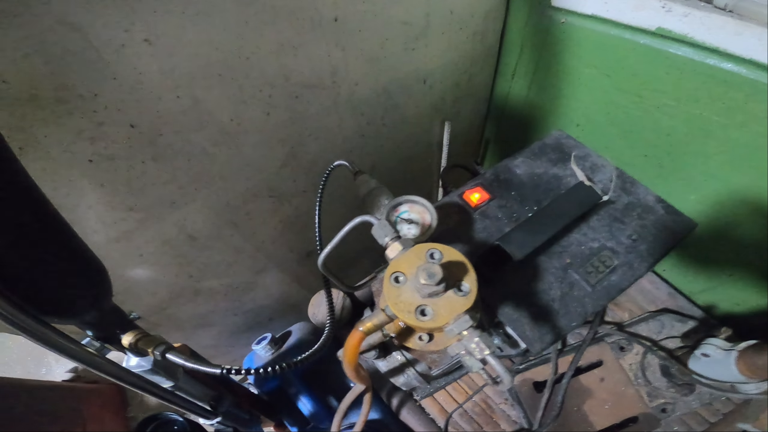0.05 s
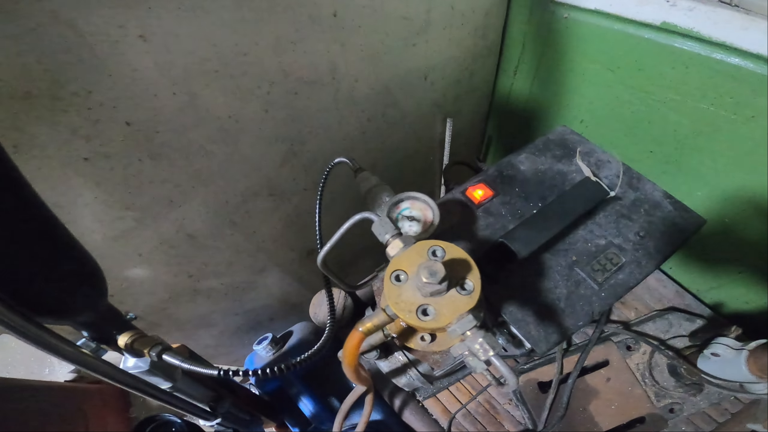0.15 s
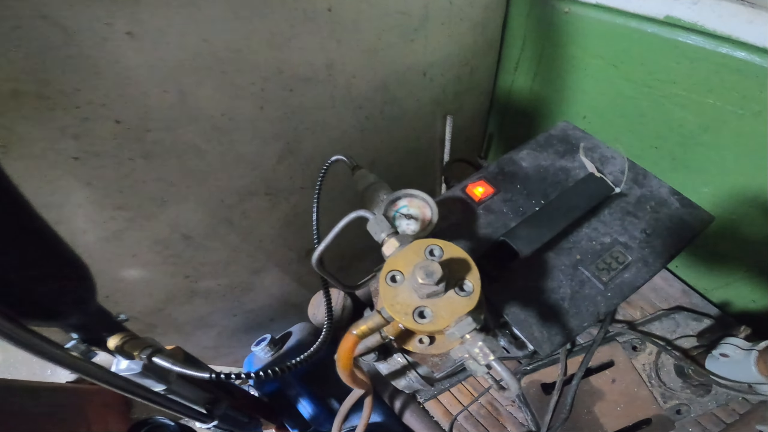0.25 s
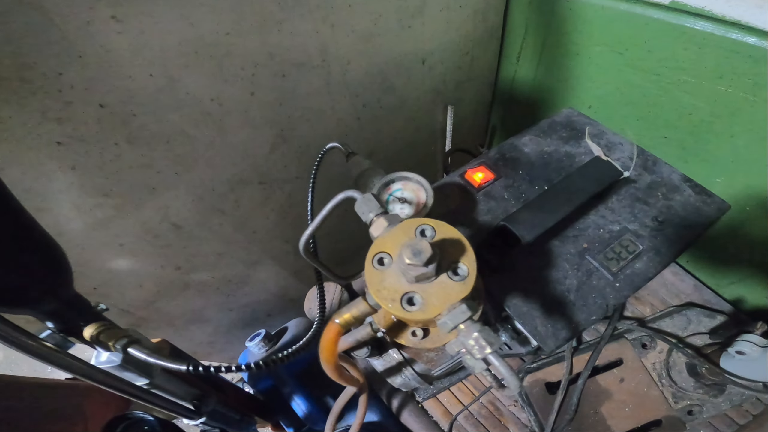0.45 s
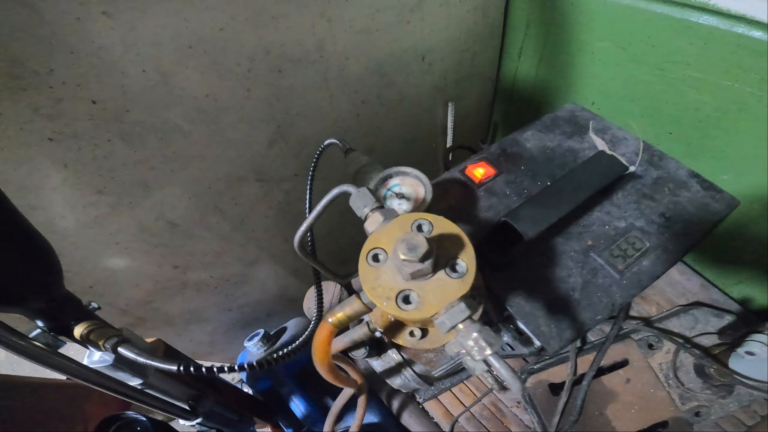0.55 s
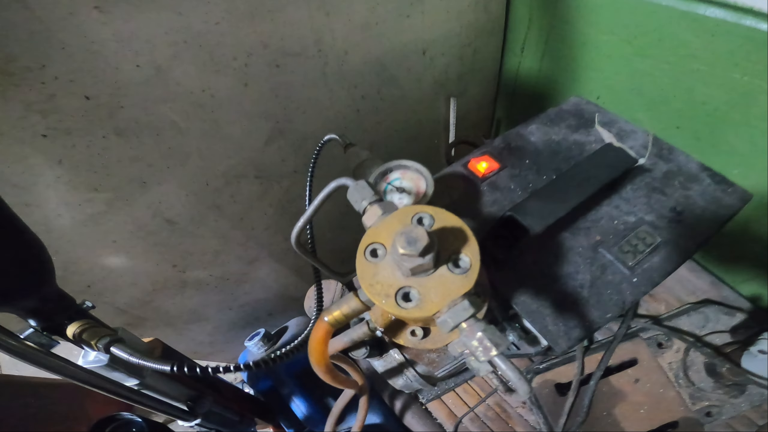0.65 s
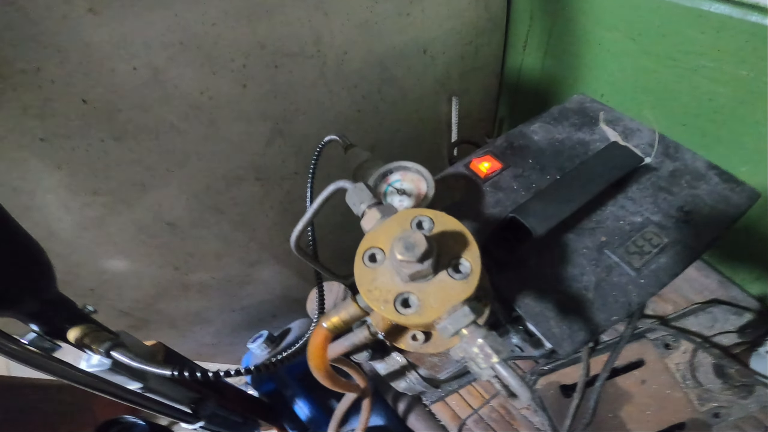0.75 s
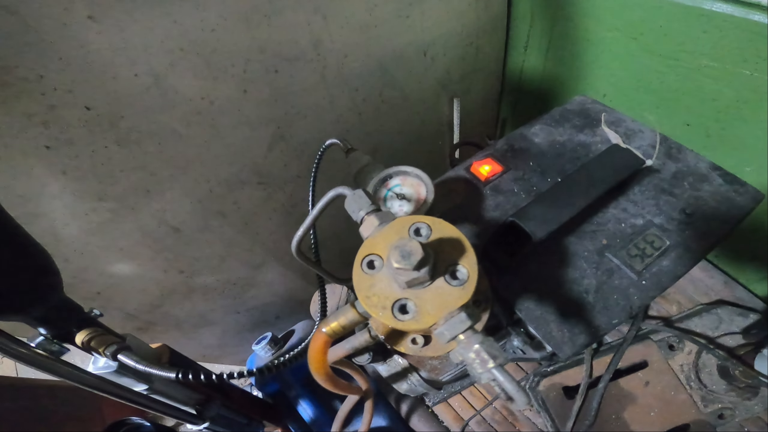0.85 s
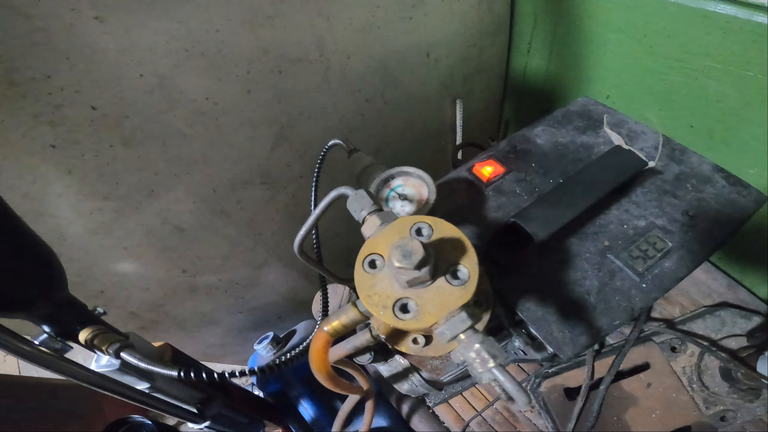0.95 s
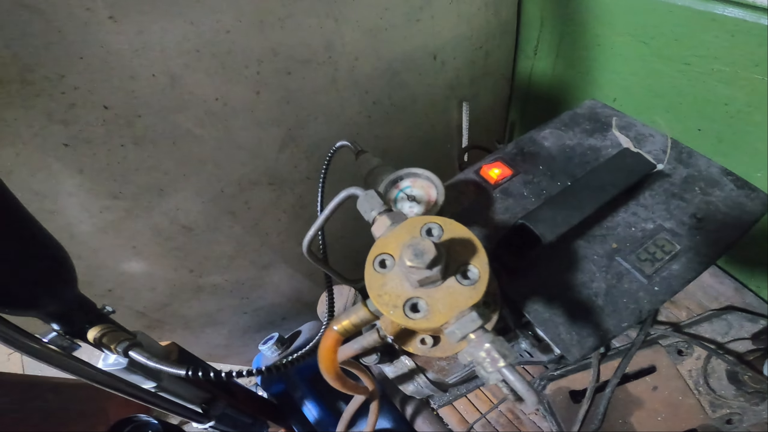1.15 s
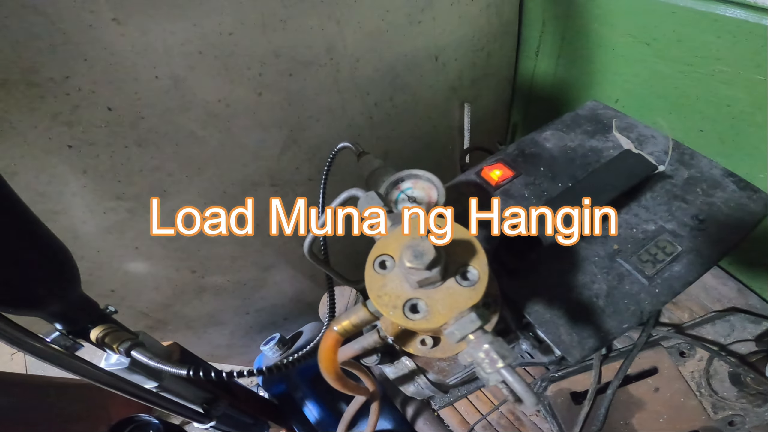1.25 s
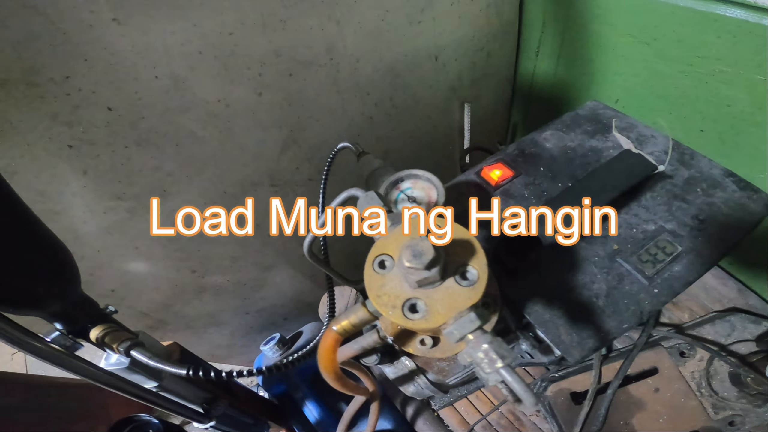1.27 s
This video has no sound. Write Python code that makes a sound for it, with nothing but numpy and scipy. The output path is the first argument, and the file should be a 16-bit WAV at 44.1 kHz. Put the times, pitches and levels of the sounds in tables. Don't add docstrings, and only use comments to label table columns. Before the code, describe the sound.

A small electric high-pressure compressor is already running at arm's length in a hard-walled room. A loud low booming tone dominates, with very rapid mechanical knocks merging into a rough metallic rattle. Thin steel parts whine above and cooling air hisses beneath. At first the drone wobbles a little; later it steadies, the boom weakens and leans right, and higher hums come forward. It never stops.

```python
import sys
import numpy as np
from scipy import signal
from scipy.io import wavfile

SR = 44100
rng = np.random.default_rng(int(sys.argv[2]) if len(sys.argv) > 2 else 0)


def transcribe(signal):
    frames = np.atleast_2d(signal).T
    limited = np.clip(frames, -1, 1)
    pcm = np.round(limited * 32767).astype(np.int16)
    wavfile.write(sys.argv[1], SR, pcm)


def volts_from_decibels(level):
    exponent = np.asarray(level, float) / 20
    return 10 ** exponent


N = 272538
MAINS_HZ = 60
LEFT_LAG_S = 45e-6
AIR_DB = -29

# start_s, fifth_order_hz, level_db, left_minus_right_db
BOOM = [
    (0.08, 276.8, -12, -0.5),
    (0.87, 275.4, -12.5, -1.5),
    (3.35, 275.1, -13.5, -1.5),
    (4.27, 275.4, -13.5, -1.5),
    (5.11, 275.4, -17, -3.5),
    (5.75, 275.4, -20, -6),
    (6.1, 275.4, -19.5, -5),
]
# start_s, sixth_order_db, eighth_order_db
SWELL = [
    (0, -32, -42.5),
    (1, -31.5, -43),
    (2, -28.5, -38),
    (3.5, -26.5, -37),
    (4.5, -27, -38.5),
    (5.3, -24, -34),
    (6.18, -22.5, -33.5),
]
# start_s, depth (0-1)
ROCKING = [
    (0, 0.3),
    (1, 0.29),
    (2.5, 0.18),
    (4, 0.12),
    (6.18, 0),
]
# multiple_of_crank_speed, level_db (re fifth)
ORDERS = [(1, -17), (2, -13), (3, -14.5), (4, -10), (5, 0), (6, -12.5), (7, -29.5), (8, -22), (9, -15.5),
          (10, -19), (11, -18), (12, -29), (13, -33), (14, -21), (15, -56.5), (16, -26.5), (17, -27),
          (18, -20.5), (19, -22), (20, -22.5), (21, -23.5), (22, -16.5), (23, -30.5), (24, -17.5),
          (25, -18), (26, -18.5), (27, -23), (28, -24.5), (29, -24.5), (30, -21.5), (31, -31), (32, -20.5),
          (33, -20), (34, -27.5), (35, -21.5), (36, -46.5), (37, -24), (38, -21), (39, -30.5), (40, -21),
          (41, -23), (42, -28), (43, -26.5), (44, -32), (45, -23.5), (46, -42), (47, -26.5), (48, -27),
          (49, -30), (50, -31), (51, -26.5), (52, -31.5)]
# start_s, low_ring_db, mode_1300_hz_db, middle_ring_db, high_ring_db
CLATTER = [(0, -27.5, -26, -29, -37), (.5, -27, -26.5, -27.5, -39), (1, -27.5, -28, -27.5, -34),
           (1.5, -27, -30.5, -26.5, -34), (1.8, -28.5, -32, -29, -36), (2.4, -27.5, -31.5, -29, -35),
           (2.8, -25.5, -32.5, -27, -32.5), (3.5, -25, -31.5, -27, -34), (4.2, -27.5, -30, -27.5, -34),
           (4.6, -27, -27.5, -26.5, -34), (5.1, -26, -29.5, -27, -31), (5.6, -24.5, -30, -26.5, -34),
           (6.18, -24.5, -28, -26, -30.5)]
# crank_angle (0-1 turn), low_db, middle_db, high_db
KNOCKS = [
    (0.041, -5, -15, -11.5),
    (.13, -11.5, -7.5, -11.5),
    (.27, -10, 0, -1.5),
    (0.352, -17.5, -11, -5),
    (.43, -3, -3.5, -7),
    (0.551, -16, -8.5, -8.5),
    (0.681, -2.5, -7.5, -4),
    (0.811, -14.5, -10.5, -11),
    (0.941, -3, 1, -9),
]
# pitch_hz, width_hz, level_db
LOW_RING = [(804, 120, -19), (1010, 180, -6), (1199, 80, 0.5), (1413, 320, -4)]
MIDDLE_RING = [(1786, 160, -0.5), (2210, 250, 1), (2510, 360, -1.5)]
HIGH_RING = [(3430, 260, -12.5), (4480, 1200, -5), (5200, 330, -4), (5970, 460, 0.5), (7000, 400, -8)]
# pitch_hz, width_hz, level_db
REEDS = [(3066, 60, 0), (3185, 62, 0), (3990, 72, 0), (4870, 120, 0)]
# start_s, first_db, second_db, third_db, fourth_db
SINGING = [(0, -36, -47.5, -42, -53.5), (.6, -37, -43, -46.5, -52), (1, -52, -40.5, -42, -51),
           (1.6, -53, -39, -42.5, -44.5), (2.299, -56, -39, -47, -33), (3, -50.5, -38.5, -41, -47),
           (3.601, -44, -40, -56, -40.5), (4.3, -59.5, -38, -45, -44), (4.7, -52, -38.5, -38, -41),
           (5.4, -47, -35.5, -38, -37), (6.18, -54, -44, -37, -49)]
# pitch_hz, level_db (per Hz)
AIR = [(25, -26), (80, -12.5), (150, -7.5), (300, -4), (420, -8), (700, -15.5), (1200, -3), (2300, -17.5),
       (3600, -9), (7600, -17), (8800, -26.5), (11200, -46), (13000, -45), (15500, -60)]
# pitch_hz, likeness (-1 to 1)
LIKENESS = [(60, 0.78), (430, 1), (1140, 0.49), (3050, 0.43), (8140, .2)]
# pitch_hz, left_minus_right_db
LEAN = [(60, -2), (120, -0.5), (240, -3.5), (490, -2), (990, -3), (2000, -1), (4040, -2.3), (7000, -5.5),
        (10000, 6.5), (14000, -2.5)]


def rms_one(x):
    return x / np.sqrt(np.mean(x ** 2) + 1e-20)


def in_time(rows):
    start_s, *columns = np.transpose(rows)
    return [np.interp(np.arange(N) / SR, start_s, column) for column in columns]


def at_hz(points, hz):
    pitch_hz, value = np.transpose(points)
    return np.interp(np.log(hz), np.log(pitch_hz), value)


def drift(rate_hz):
    r = np.exp(-80 * np.pi * rate_hz / SR)
    white = rng.standard_normal(N // 40 + 2002)
    slow = signal.lfilter([1], [1, -2 * r, r * r], white)[2000:]
    return np.interp(np.arange(N) / 40, np.arange(len(slow)), rms_one(slow - slow.mean()))


def centred(level_db):
    return level_db - level_db.mean()


def left_right(difference_db):
    return volts_from_decibels(difference_db * np.array([[.5], [-.5]]))


def lean(hz):
    return left_right(at_hz(LEAN, hz))


def orders(turns, boom_db, pan_db, rings_db):
    t = np.arange(N) / SR
    sixth_db, eighth_db = in_time(SWELL)
    (depth,) = in_time(ROCKING)
    fade_db, swell_db = centred(boom_db), centred(sixth_db)
    rock = np.cos(2 * np.pi * 2.74 * (t - .16))
    dip = np.clip(-rock, 0, 1) ** 3 * np.exp(-(t / 1.1) ** 4)
    slip = np.exp(4j * np.pi * (MAINS_HZ * t - turns))
    moves_db = {2: 0.51 * fade_db, 3: .5 * swell_db - 14.0 * dip, 4: .6 * fade_db,
                5: fade_db, 6: swell_db, 8: centred(eighth_db)}
    rocks = {3: .3, 4: 1.0, 5: .05, 6: .2}
    low_db, mode_db, middle_db = [centred(v) for v in rings_db[:3]]
    late, hard = 0.0023 * drift(25), volts_from_decibels(0.84 * drift(30))
    scatter, out = rng.standard_normal(len(ORDERS)), np.zeros((2, N))
    for (k, level_db), chance in zip(ORDERS, scatter):
        loose = np.clip((k - 6) / 18.0, .06, 1)
        if k < 15:
            ring_db = 0
        elif k < 21:
            ring_db = low_db
        elif k < 27:
            ring_db = mode_db
        else:
            ring_db = middle_db
        move_db = moves_db.get(k, ring_db) + 2.5 * loose * drift(1.0)
        gain = volts_from_decibels(-15.0 + level_db - 4.4 * loose + move_db)
        gain *= 1 + rocks.get(k, 0) * depth * rock
        if k > 14:
            gain *= hard
        if k < 9:
            phase = 3.9 - 1.1 * k + 1.6 * (k > 4) - 1.9 * (k == 1)
        else:
            phase = .38 * k + .6 * chance
        wave = np.sqrt(2) * gain * np.exp(1j * (2 * np.pi * k * (turns + loose * late) + phase))
        wave *= 1 + (.035 if k == 5 else .06) * slip
        skew = 2 * np.pi * k * 55 * LEFT_LAG_S + 0.19 * loose * chance
        sides = np.real(wave * np.exp([[-.5j * skew], [.5j * skew]])) * lean(55 * k)
        if k == 5:
            sides *= left_right(centred(pan_db))
        out += sides
    return out


def resonate(x, modes):
    out = 0
    for k, (hz, width_hz, level_db) in enumerate(modes):
        r = np.exp(-np.pi * width_hz / SR)
        b = (1 - r * r) / 2 * np.array([1, 0, -1])
        a = [1, -2 * r * np.cos(2 * np.pi * hz / SR), r * r]
        out = out + (-1) ** k * volts_from_decibels(level_db) * signal.lfilter(b, a, x)
    return out


def knocks(turns, column, modes, jitter, spread_db, burst_s, wide, hz, firm):
    table, whole_turns = np.array(KNOCKS), np.arange(int(turns[-1]))[:, None]
    count = len(whole_turns)
    wander = np.array([drift(.6)[::N // count][:count] for _ in table]).T
    angle = whole_turns + table[:, 0] + jitter * rng.standard_normal(wander.shape)
    at = np.interp(angle, turns, np.arange(N)).astype(int)
    clicks = np.zeros(N)
    clicks[at] = volts_from_decibels(table[:, column] + 1.4 * wander + spread_db * rng.standard_normal(wander.shape))
    rattle = signal.lfilter([1], [1, -np.exp(-1 / (burst_s * SR))], clicks)
    strike = rattle * rng.standard_normal((2, N)) + firm * clicks * [[1], [0]]
    mid, side = resonate(strike + 1e-9, modes)
    both = mid + wide * side * [[1], [-1]]
    both[0] = np.interp(np.arange(N) - LEFT_LAG_S * SR, np.arange(N), both[0])
    return rms_one(both) * lean(hz)


def clatter(turns, rings_db):
    low_db, _, middle_db, high_db = rings_db
    low = knocks(turns, column=1, modes=LOW_RING, jitter=.008, spread_db=1.0,
                 burst_s=0.00065, wide=0.23, hz=1200, firm=.1)
    middle = knocks(turns, column=2, modes=MIDDLE_RING, jitter=.006, spread_db=0.5,
                    burst_s=0.00056, wide=.3, hz=2200, firm=0.075)
    high = knocks(turns, column=3, modes=HIGH_RING, jitter=.004, spread_db=2.0,
                  burst_s=0.0005, wide=0.18, hz=4500, firm=2.0)
    return volts_from_decibels(low_db - 8) * low + volts_from_decibels(middle_db - 6) * middle + volts_from_decibels(high_db - 3) * high


def reeds(turns):
    out = 0
    for reed, level_db in zip(REEDS, in_time(SINGING)):
        ring = knocks(turns, column=3, modes=[reed], jitter=0.0012, spread_db=0.5,
                      burst_s=0.00035, wide=.5, hz=reed[0], firm=11.0)
        out = out + volts_from_decibels(level_db) * ring
    return out


def mains_hum():
    return volts_from_decibels(-53) * np.sin(4 * np.pi * MAINS_HZ * np.arange(N) / SR)


def air():
    out, edges_hz = 0, 22 * 2 ** np.arange(0, 9.6, .5)
    white = rng.standard_normal((2, 2, N))
    for k, (low, high) in enumerate(zip(edges_hz, edges_hz[1:])):
        band = signal.butter(3, [low, high], "band", fs=SR, output="sos")
        mid, side = signal.sosfilt(band, white[k % 2])
        hz = np.sqrt(low * high)
        alike = np.clip(at_hz(LIKENESS, hz), -1, 1)
        gain = volts_from_decibels(at_hz(AIR, hz) + 1.0 * drift(7.1)) * lean(hz)
        out = out + gain * (np.sqrt(1 + alike) * mid + np.sqrt(1 - alike) * side * [[1], [-1]])
    return volts_from_decibels(AIR_DB) * rms_one(out)


def scene():
    fifth_hz, boom_db, pan_db = in_time(BOOM)
    turns = .025 + np.cumsum(fifth_hz / 5) / SR
    rings_db = in_time(CLATTER)
    machine = orders(turns, boom_db, pan_db, rings_db) + clatter(turns, rings_db) + reeds(turns)
    return machine + mains_hum() + air()


def roll_off(x):
    return signal.sosfilt(signal.butter(12, 15750, fs=SR, output="sos"), x)


def record(dry):
    dull = signal.sosfilt(signal.butter(6, 7900, fs=SR, output="sos"), dry)
    mix = dull + volts_from_decibels(-1.5) * (dry - dull)
    return roll_off(mix)


dry = scene()
out = record(dry)
transcribe(out)
```